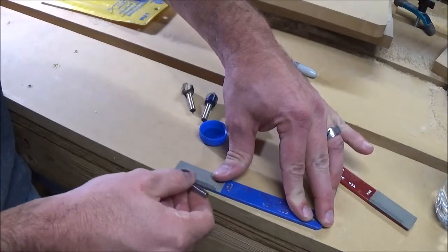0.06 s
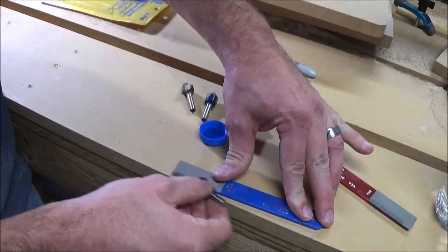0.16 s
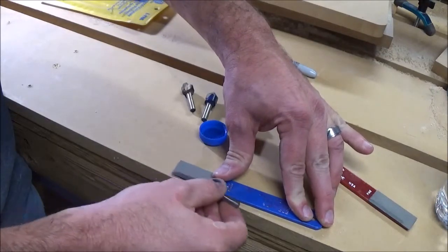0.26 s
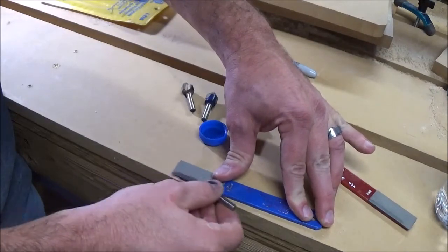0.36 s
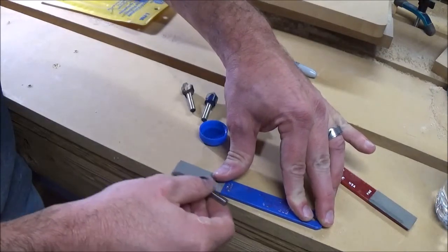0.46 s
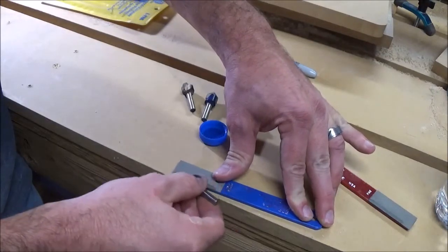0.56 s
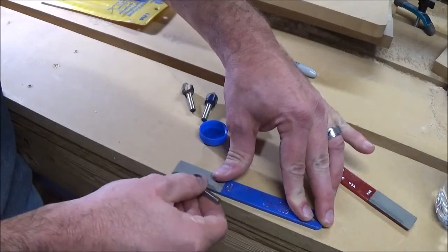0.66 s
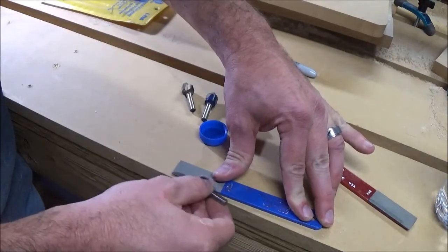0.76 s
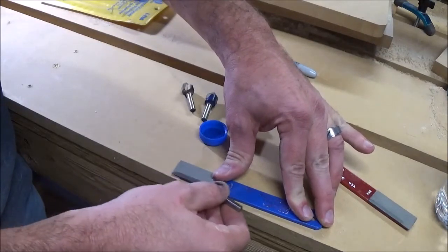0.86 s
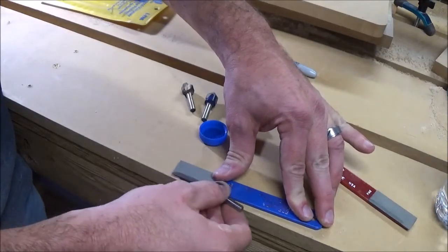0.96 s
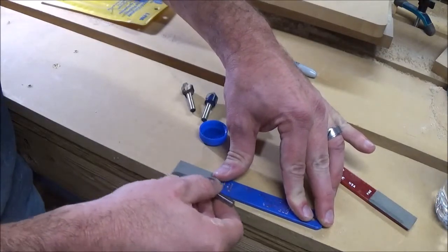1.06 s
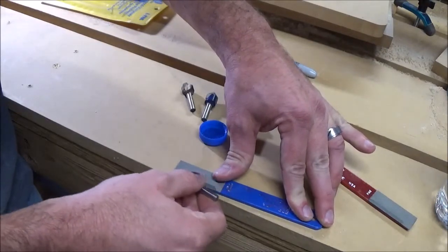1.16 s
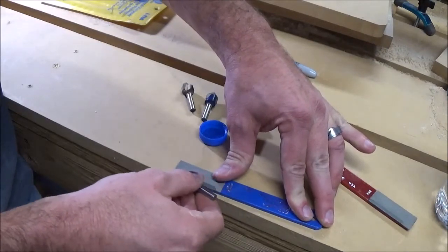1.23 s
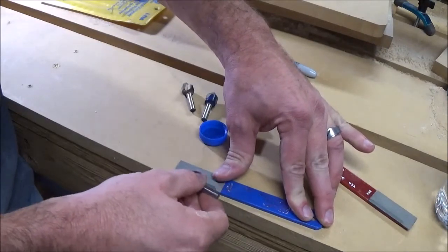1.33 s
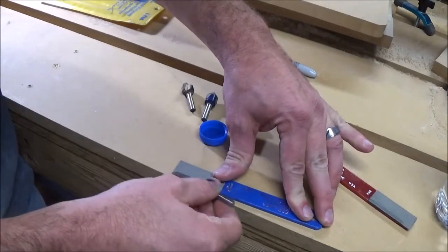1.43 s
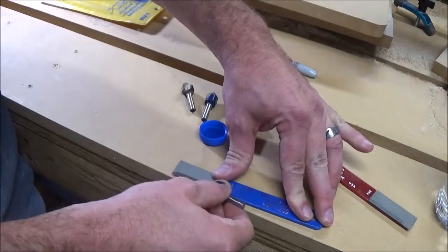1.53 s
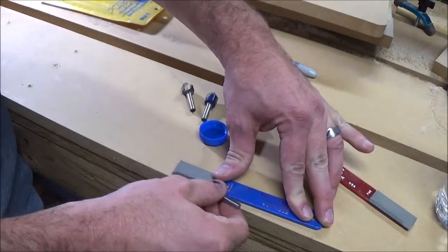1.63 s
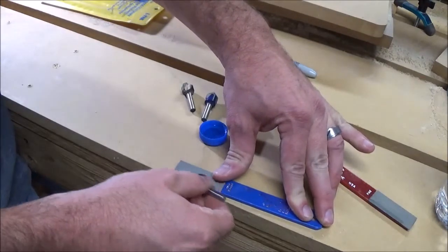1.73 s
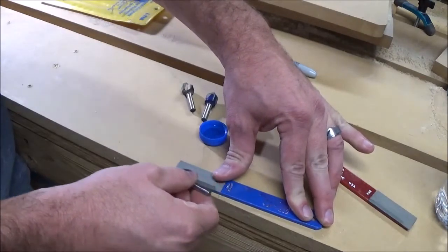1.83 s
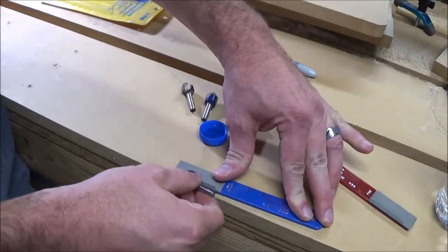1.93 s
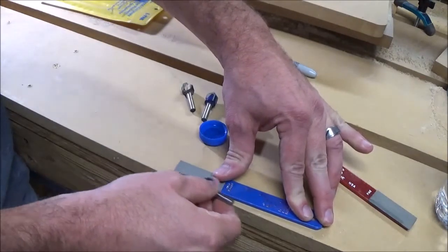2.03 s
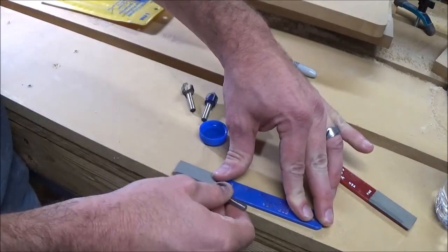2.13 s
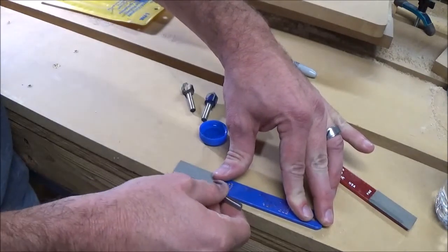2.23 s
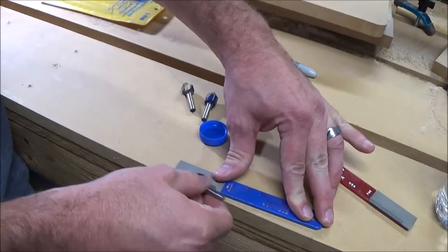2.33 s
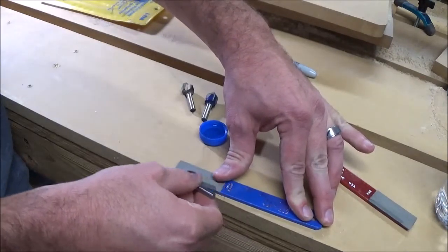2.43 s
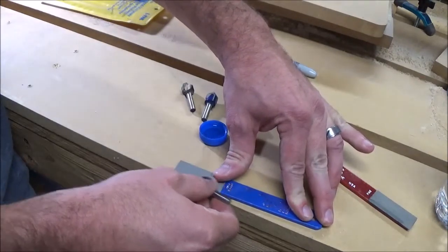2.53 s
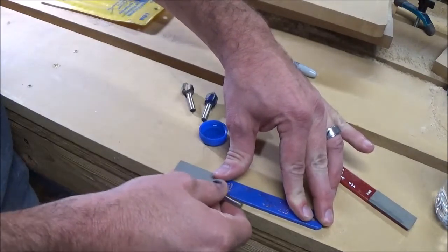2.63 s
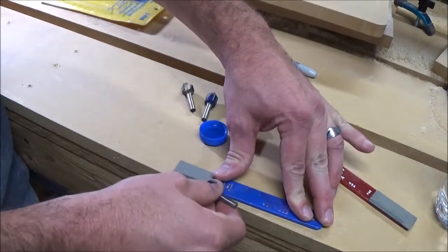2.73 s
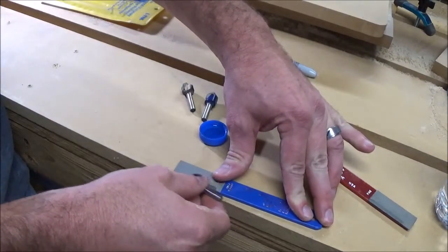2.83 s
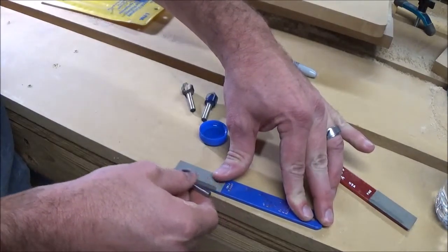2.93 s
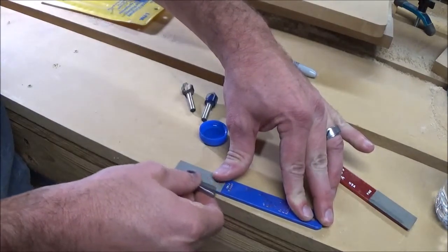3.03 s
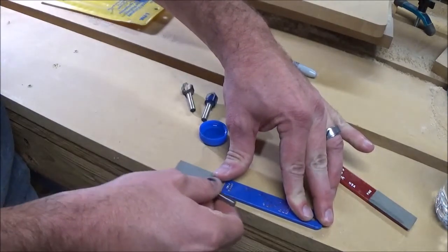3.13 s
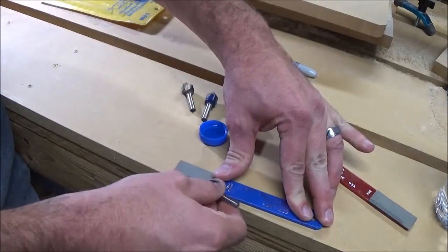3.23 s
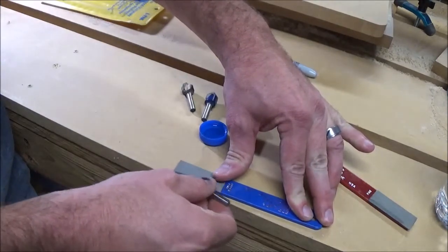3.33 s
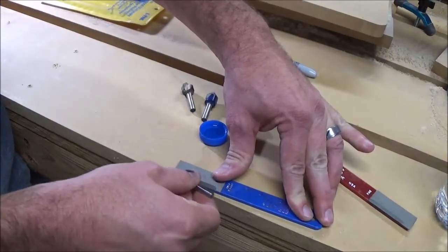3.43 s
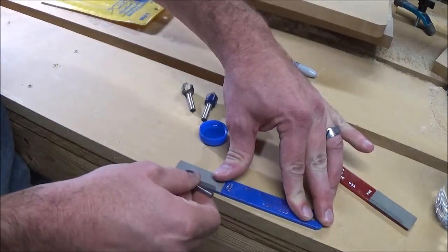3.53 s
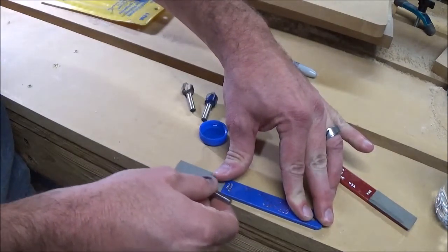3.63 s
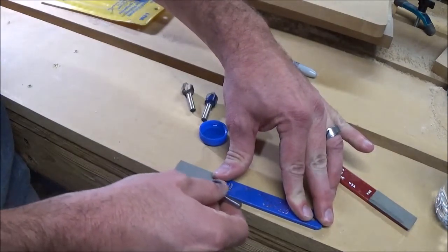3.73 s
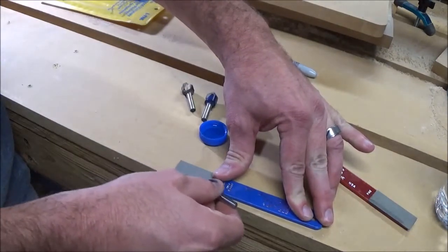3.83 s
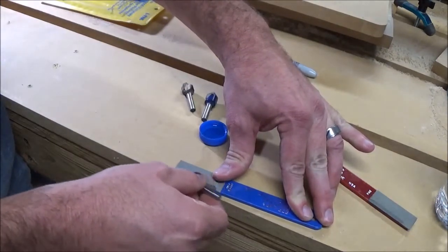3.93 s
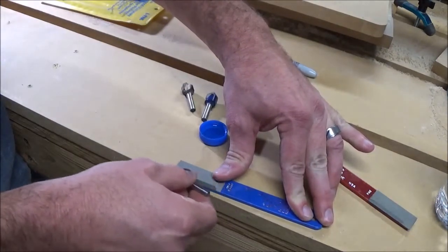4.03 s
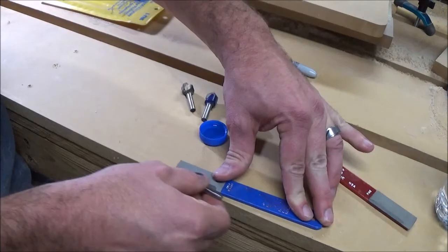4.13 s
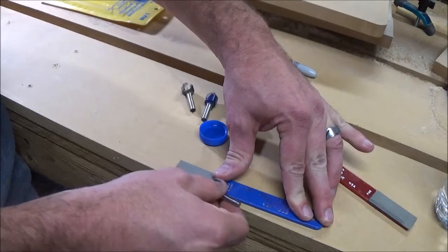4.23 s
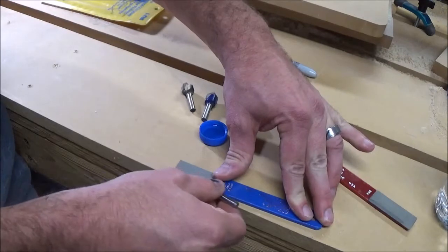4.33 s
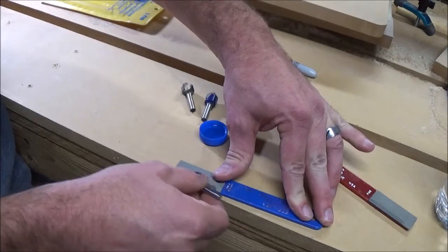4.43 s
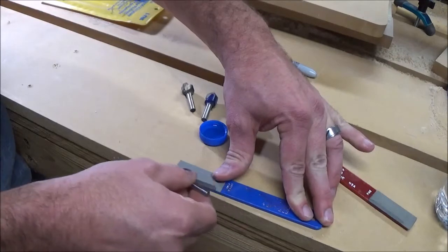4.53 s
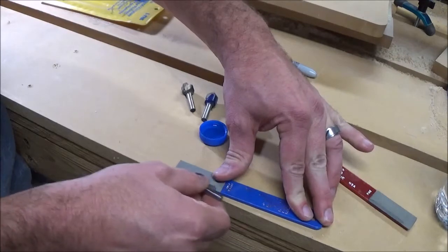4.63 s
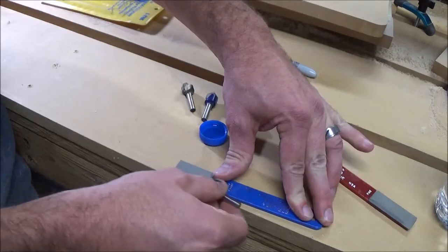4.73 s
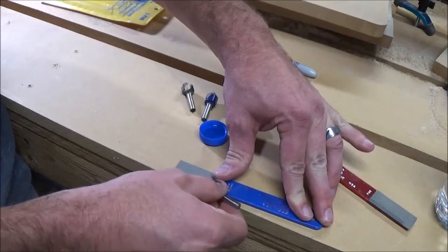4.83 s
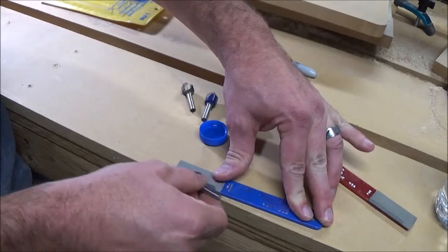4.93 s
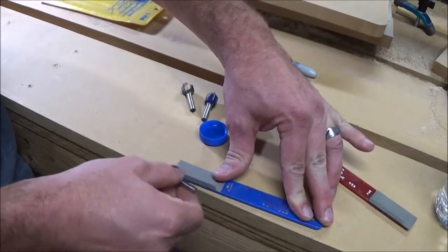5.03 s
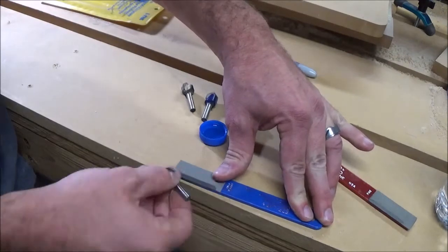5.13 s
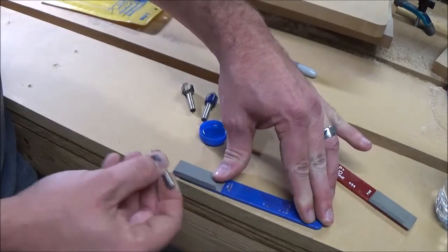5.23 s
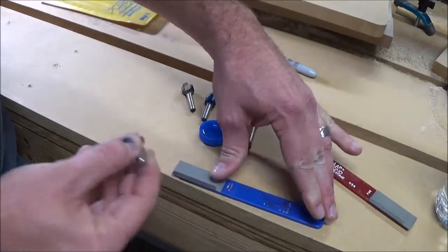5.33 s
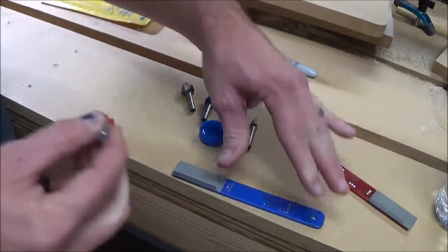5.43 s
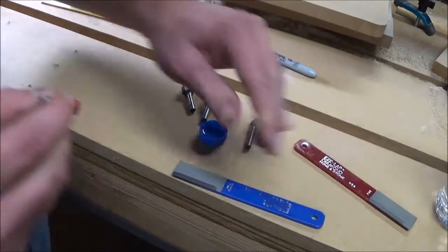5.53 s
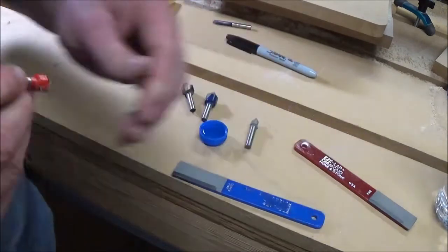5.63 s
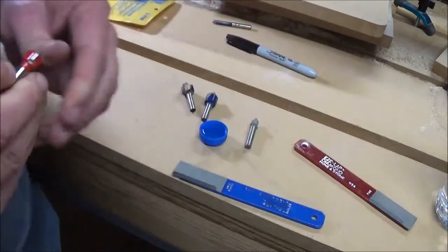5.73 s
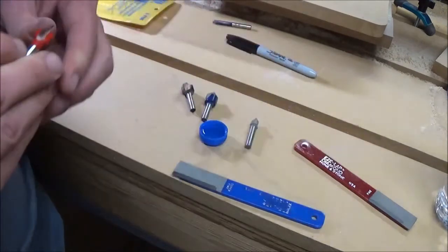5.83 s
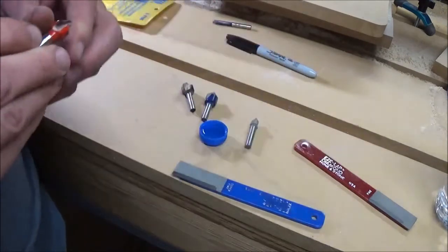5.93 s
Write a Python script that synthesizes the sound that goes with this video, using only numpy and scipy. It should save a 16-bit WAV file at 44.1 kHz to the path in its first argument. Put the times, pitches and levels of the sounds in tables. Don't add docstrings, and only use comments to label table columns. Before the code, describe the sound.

Rapid gritty metallic rubbing, about four strokes a second with tiny ticks at the turns, ends abruptly; faint hand clicks and room noise follow.

```python
import sys
import numpy as np
from scipy import signal
from scipy.io import wavfile
from scipy.ndimage import uniform_filter1d

SR = 44100
rng = np.random.default_rng(int(sys.argv[2]) if len(sys.argv) > 2 else 0)


def to_linear_factor(level_db):
    exponent = np.asarray(level_db, float) / 20
    return 10 ** exponent


def master_out(mix):
    frames = np.transpose(np.atleast_2d(mix))
    ceiling = np.clip(frames, -1, 1)
    pcm = np.round(ceiling * 32767).astype(np.int16)
    wavfile.write(sys.argv[1], SR, pcm)


N = 263718

# (start [s], length [s], pressure [dB], from place [0-1], to place [0-1])
STROKES = [(-0.046, 0.084, -1, 0.78, 0.64), (0.118, 0.139, 0.05, 0.94, 0.26),
           (0.445, 0.1, -0.1, 0.35, 0.54), (0.745, 0.16, 1.5, 0.65, 0.21), (1.015, 0.21, 1.0, 0.044, 0.82),
           (1.377, 0.17, 0.1, 0.72, 0.12), (1.631, 0.22, 0.8, 0.0, 0.86), (1.946, 0.23, 0, 0.91, 0.025),
           (2.221, 0.2, 1.5, 0.075, 0.77), (2.5, 0.14, 2, 0.81, 0.059), (2.735, 0.23, -1.4, 0.1, 0.88),
           (3.05, 0.16, 0.1, 0.91, 0.02), (3.309, 0.19, -1.0, 0.084, 0.94), (3.55, 0.21, -1.5, 0.94, 0.035),
           (3.831, 0.23, -1.15, 0.11, 0.93), (4.095, 0.18, -0.9, 1.0, 0.068),
           (4.352, 0.21, -1.3, 0.09, 0.95), (4.598, 0.2, -1.5, 0.92, 0.1), (4.861, 0.23, -0.8, 0.15, 0.92)]
# (place [0-1], bit [dB], hone [dB], bench [dB])
FORWARD_RESPONSE = [(0.0, -26.5, -34, -44.5), (0.17, -30.5, -34, -38), (0.37, -26, -30.5, -36),
                    (0.5, -18.5, -30, -34.5), (0.61, -20, -33.5, -38.5), (0.73, -22, -31, -34.5),
                    (0.87, -29.5, -33, -39), (1.0, -24.5, -29.5, -40.5)]
# (place [0-1], bit [dB], hone [dB], bench [dB])
BACKWARD_RESPONSE = [(-0.0, -28.5, -36.5, -39.5), (0.16, -25.5, -34, -36.5), (0.34, -24.5, -30.5, -36),
                     (0.5, -17, -36, -37), (0.62, -24.5, -32.5, -39.5), (0.74, -17, -27.0, -34.5),
                     (0.87, -26.5, -38, -46.5), (1.0, -19, -28, -44)]
# (bit [dB], hone [dB], bench [dB])
COAST_DB = (-44, -45, -43.5)
# (bit [dB], hone [dB], bench [dB])
CREEP_DB = (-50.5, -65, -58.5)
# (start [s], length [s], bit [dB], hone [dB], bench [dB])
SLIPS = [(.333, .082, -46, -50, -52.5), (0.554, 0.022, -25.5, -37.5, -42.5), (.605, 0.055, -56, -53, -69),
         (1.388, .025, -17, -36, -50), (1.952, 0.013, -32, -53, -50), (1.273, 0.084, -45, -55, -52),
         (1.897, 0.048, -40, -50, -47.5), (2.463, 0.033, -40, -47, -53), (2.682, 0.022, -40, -53, -47.5),
         (2.993, 0.027, -41, -57, -58), (3.246, 0.013, -35, -39, -41), (5.062, 0.02, -20, -24.5, -40)]
# (start [s], length [s])
LIFTS = [
    (.417, 0.03),
    (1.352, 0.038),
    (4.334, 0.018),
]

# (frequency [Hz], width [Hz],
# level [dB] when touched at the handle end, one quarter, middle, three quarters, tip)
BIT_MODES = [(6420, 460, -9, -0.5, -13, -19, -0.5), (6980, 910, 4, -4, -21.5, -6, -4),
             (7690, 670, -2, -8, -10.5, 0, -5.5), (8020, 160, -32, -5.5, 0, -2.5, 3),
             (8170, 120, -16, -10.5, -8, -16, -25), (8290, 250, -11, -8.5, 2, -7, -1),
             (8560, 92, -28, -8, 0.5, 1, -13), (8810, 160, 0, -11.5, -4.5, 1, -10),
             (9200, 510, -1, -17, 1, -13.5, -9), (9710, 150, -10, -2, -15, -6, -6.5),
             (10080, 210, 2, -11, -7, -6, -29), (10850, 370, -1.5, -3, -12.5, 0.5, -5)]
HONE_MODES = [(3035, 680, -2, 1, 3.5, 3, 1.5), (3610, 190, 5, -1.5, -4.5, 0.5, 0),
              (3903, 500, -2.5, 7.5, 7.5, -4, 5), (4380, 440, 5, -5.5, 0.5, -6.5, -5),
              (4705, 230, -5, -4.5, -1.5, -1, -12), (5600, 1300, 9, -4.5, -1, 7, 0.5)]
BENCH_MODES = [(627.5, 167, -8, -21, -8.5, -9, -13.5), (1095, 580, -14.5, -11, -8, -3.5, -6.5),
               (1203, 60, -14, -11.5, -5.5, -2, -8.5), (1546, 670, -14.5, -8.5, -2, -3.5, -3.5),
               (1874, 110, -14.5, -3, -4, -1, -9.5), (2006, 250, -15, -2, -7, -13, -1),
               (2570, 730, -4, 3.5, 2, 2.5, -16)]
# (frequency [Hz], width [Hz], level [dB])
BENCH_LOW_MODES = [(240, 142, 2), (418, 36, 2.5), (548, 29, -6.5)]
# (place [0-1], frequency [Hz])
EDGE_RING = [(0, 6420), (.45, 8140), (.75, 9770), (1, 9000)]

# (time [s], peak [dB], pitch [Hz], low part [dB])
ROCKING_TICKS = [(0.1096, -17, 10300, -34), (0.589, -24, 8700, -21.5), (0.599, -17.5, 6800, -45),
                 (0.6436, -17.5, 9400, -20), (0.6664, -29, 8500, -24), (0.684, -28, 8700, -29),
                 (0.69, -24, 9430, -28), (0.7018, -27, 9200, -34), (0.705, -22, 9400, -38),
                 (0.7184, -33, 6730, -29), (0.7211, -22, 4930, -39), (0.7404, -15, 9740, -18),
                 (1.2795, -28, 9500, -33), (1.284, -19.5, 9200, -22), (1.3154, -11.5, 9050, -13),
                 (1.331, -23, 8100, -28), (1.345, -30.5, 8000, -21), (1.9043, -21, 8200, -39),
                 (1.9176, -17.5, 8420, -24), (1.929, -14, 8350, -28), (3.006, -31, 8000, -25),
                 (4.109, -19, 8650, -25), (4.113, -14, 8560, -16), (4.131, -13, 8360, -28),
                 (0.3691, -33, 4250, -34),
    (1.6004, -27, 6640, -22),
    (2.691, -22, 8100, -30),
    (3.284, -28, 9790, -12),
    (3.2987, -22.5, 8070, -31),
    (4.318, -31, 9500, -30),
    (4.329, -21, 7500, -30),
    (4.844, -31, 7500, -28),
]
# (time [s], peak [dB], pitch [Hz], low part [dB], decay [ms])
LETTING_GO = [
    (5.483, -40, 2420, 3.5, 0.47),
    (5.4884, -34.5, 4600, -20, 1.2),
    (5.4943, -31.5, 4900, -9, 1.5),
    (5.6344, -33, 3760, -7, 1.2),
]
# (time [s], peak [dB], decay [ms], hardness [dB])
THUDS = [
    (0.019, -37.5, 32, -9),
    (.69, -43, 46, -30),
    (1.951, -35.5, 87, -7),
    (5.3659, -33.5, 5.9, 15),
    (5.385, -43, 16, -7),
    (5.451, -47, 31, -18),
    (5.485, -40.5, 6.6, -5.5),
    (1.314, -32, 8.5, 2),
]

# (frequency [Hz], t60 [s], left-right difference [dB])
SHOP = [(200, 1, -21), (1030, 0.46, -4.5), (2970, 0.22, 1), (9000, 0.28, -3.5)]
# (frequency [Hz], density [dB per Hz])
AIR = [(18, -45), (30, -8), (92, -13), (151, -10), (185, -9), (214, -12.5), (282, -14.5), (441, -21),
       (538, -13.5), (610, -18), (2520, -20), (3070, -21.5), (5600, -26.5), (9000, -23), (11500, -26.5),
       (15000, -77), (22000, -120)]
# (time [s], level [dB])
AIR_SWELL = [(0, 2), (5.3, -1.5), (5.6, -4), (5.81, -2), (5.83, 0), (5.98, -1)]
# (frequency [Hz], correlation [-1 to 1])
AIR_SAME = [(60, 0.97), (220, 0.88), (820, 0.23), (3020, 0.46), (11200, 0.73)]
# (frequency [Hz], rms [dB])
HUM = [(60, -62.5), (90, -76), (183, -65.5)]
# (time [s], peak level [dB])
PIP_DB = [(5.8, -51.5), (5.83, -54)]


def rubbing():
    place, bit_drive, hone_drive, bench_drive = hand()
    slips = grit(2200, spread_db=2.5, slurry=0.68, clump_db=0.81)
    finer = slips + 0.56 * rng.standard_normal(N)
    bench = touched(finer, BENCH_MODES, place) + to_linear_factor(-17.0) * body(finer, BENCH_LOW_MODES)

    forward = uniform_filter1d(1.0 * (np.gradient(place) > 0), size=400)
    edge_hz = np.interp(place, *np.transpose(EDGE_RING))
    edge_gain = 0.17 + 0.48 * forward
    edge = edge_gain * gliding(slips, edge_hz, 840)
    ring = chatter(depth_db=4.2) * (touched(slips, BIT_MODES, place) + edge)

    squeak_hz, squeak_width_hz, squeak_db = 5870, 710, 5.5
    squeak_place, squeak_reach = 0.85, 0.05
    nearness = np.exp(-((place - squeak_place) / squeak_reach) ** 2)
    squeak = (1 - forward) * nearness * body(finer, [(squeak_hz, squeak_width_hz, 0)])
    hone = touched(finer, HONE_MODES, place) + to_linear_factor(squeak_db) * squeak
    return bit_drive * ring + hone_drive * hone + bench_drive * bench


def hand():
    t = np.arange(0, N + 64, 32) / SR
    stroke_attack_s, stroke_release_s = 0.019, 0.019
    slip_attack_s, slip_release_s = 0.0064, 0.011
    coast_db_per_s, lift_db = -118, -7

    start, length, _, origin, goal = np.transpose(STROKES)
    turn_times = np.ravel([start, start + length], "F")
    turn_places = np.clip(np.ravel([origin, goal], "F"), 0, 1)
    place = np.interp(t, turn_times, turn_places)

    power = to_linear_factor(2 * np.array(CREEP_DB))[:, None] * (t < start[-1] + length[-1])
    for s, long, pressure_db, origin, goal in STROKES:
        at, *answers = np.transpose(FORWARD_RESPONSE if goal > origin else BACKWARD_RESPONSE)
        answer_db = np.array([np.interp(place, at, a) for a in answers])
        stroke = to_linear_factor(pressure_db + answer_db) * gate(t, s, long, stroke_attack_s, stroke_release_s)
        since = t - s - long
        coast_db = np.array(COAST_DB)[:, None] + coast_db_per_s * np.maximum(since, 0)
        coast = to_linear_factor(coast_db) * (since > 0)
        power = power + stroke ** 2 + coast ** 2
    for s, long in LIFTS:
        power = power * to_linear_factor(2 * lift_db * gate(t, s, long, slip_attack_s, slip_release_s))
    for s, long, *dbs in SLIPS:
        slip = to_linear_factor(np.array(dbs))[:, None] * gate(t, s, long, slip_attack_s, slip_release_s)
        power = power + slip ** 2
    return [np.interp(np.arange(N) / SR, t, curve) for curve in (place, *np.sqrt(power))]


def gate(t, start, length, attack_s, release_s):
    edge_db = -23.5
    rise = (t - start) / attack_s
    fall = (start + length - t) / release_s + 1
    inside = np.minimum(rise, fall)
    return to_linear_factor(edge_db * (1 - np.minimum(inside, 1)))


def grit(per_s, spread_db, slurry, clump_db):
    sizes = to_linear_factor(spread_db * np.minimum(rng.exponential(1, N), 3.0))
    happens = rng.random(N) < per_s / SR
    slips = sizes * happens * rng.choice([-1.0, 1.0], N)
    clumps = uniform_filter1d(uniform_filter1d(rng.standard_normal(N), size=200), size=200)
    excitation = evened(slips) + slurry * rng.standard_normal(N)
    return evened(excitation * to_linear_factor(clump_db * evened(clumps)))


def touched(x, modes, place):
    grip_db, grip_per_s = 2.5, 14
    t, knots = np.arange(N) / SR, np.arange(0, N / SR + 1, 1 / grip_per_s)
    gains, rings = [], []
    for hz, width, *dbs in modes:
        shape = to_linear_factor(np.interp(4 * place, range(5), dbs))
        grip = np.interp(t, knots, rng.standard_normal(len(knots)))
        gains.append(shape * to_linear_factor(grip_db * grip))
        rings.append(evened(resonate(resonate(x, hz, width), hz, 1.51 * width)))
    total = sum((-1) ** k * g * r for k, (g, r) in enumerate(zip(gains, rings)))
    return total / np.linalg.norm(gains, axis=0)


def gliding(x, hz, width):
    turn = np.exp(2j * np.pi * np.cumsum(hz) / SR)
    r = np.exp(-np.pi * width / SR)
    smoothed = signal.lfilter([1], [1, -2 * r, r * r], x / turn)
    return evened((turn * smoothed).real)


def chatter(depth_db):
    bounce = uniform_filter1d(uniform_filter1d(rng.standard_normal(N), size=36), size=36)
    return evened(to_linear_factor(depth_db * np.tanh(evened(bounce))))


def body(x, modes):
    total = 0
    for k, (hz, width, db, *_) in enumerate(modes):
        total = total + (-1) ** k * to_linear_factor(db) * resonate(x, hz, width) / np.sqrt(width)
    return evened(total)


def resonate(x, hz, width):
    return signal.lfilter(*signal.iirpeak(hz, hz / width, SR), x)


def evened(x):
    return x / np.sqrt(np.mean(x ** 2) + 1e-20)


def ticks():
    size, tick_ms = 2000, 0.86
    out, ms = np.zeros(N + size), np.arange(size) / SR * 1000
    rows = [(*row, tick_ms) for row in ROCKING_TICKS] + LETTING_GO
    shakes = rng.standard_normal((len(rows), size))
    for (s, db, hz, low_db, decay_ms), shake in zip(rows, shakes):
        burst = shake * np.exp(-ms / max(decay_ms, 0.2)) * np.minimum(ms / 0.4, 1)
        ring = resonate(resonate(burst, hz, 2000), hz, 5200)
        knock = body(shake * np.exp(-ms / 2.3), BENCH_MODES[3:])
        at = round(s * SR)
        out[at:at + size] += to_linear_factor(db) * (ring / abs(ring).max() + to_linear_factor(low_db) * knock / abs(knock).max())
    return out[:N]


def thuds():
    size = 8000
    upper_modes = [(800, 500, 0), (1220, 350, 0), (1750, 500, 0), (2500, 900, 0)]  # (Hz, width Hz, dB)
    out, ms = np.zeros(N + size), np.arange(size) / SR * 1000
    shakes = rng.standard_normal((len(THUDS), size))
    for (s, db, decay_ms, hard_db), shake in zip(THUDS, shakes):
        push = shake * np.exp(-ms / decay_ms) * np.minimum(ms * to_linear_factor(hard_db), 1)
        thud = body(push, BENCH_LOW_MODES) + to_linear_factor(hard_db) * body(push, upper_modes)
        at = round(s * SR)
        out[at:at + size] += to_linear_factor(db) * thud / abs(thud).max()
    return out[:N]


def shop(x):
    taps = np.zeros((2, SR // 2))
    at = np.arange(100, SR // 2 - 20, 20)
    at = at + rng.integers(0, 20, (2, len(at)))
    signs = rng.choice([-1.0, 1.0], at.shape)
    np.put_along_axis(taps, at, signs, 1)
    hz, t, z = signal.stft(taps, SR, nperseg=256)
    t60 = read([(row[0], row[1]) for row in SHOP], hz)[:, None]
    apart_db = read([(row[0], row[2]) for row in SHOP], hz)[:, None]
    shared, apart = z * to_linear_factor(-60 * t / t60)
    apart = to_linear_factor(apart_db) * apart
    tail = signal.istft(np.array([shared + apart, shared - apart]), SR, nperseg=256)[1]
    return signal.fftconvolve(x[None], tail / np.linalg.norm(tail[0]), axes=1)[:, :N]


def read(points, hz):
    f, value = np.transpose(points)
    return np.interp(np.log(hz + 1), np.log(f + 1), value)


def air():
    frames, hz = N // 512 + 5, np.fft.rfftfreq(2048, 1 / SR)
    a, b, c, d = rng.standard_normal((frames, 1025, 4)).T
    same = np.clip(read(AIR_SAME, hz), -1, 1)[:, None]
    left = a + 1j * b
    right = same * left + np.sqrt(1 - same ** 2) * (c + 1j * d)
    swell_db = np.interp(np.arange(frames) * 512 / SR, *np.transpose(AIR_SWELL)) * (hz[:, None] > 500)
    spectra = np.array([left, right]) * to_linear_factor(read(AIR, hz)[:, None] + swell_db)
    noise = evened(signal.istft(spectra, nperseg=2048, noverlap=1536)[1][:, :N])
    t = np.arange(N) / SR
    hum = sum(to_linear_factor(db) * np.sqrt(2) * np.sin(2 * np.pi * f * t) for f, db in HUM)
    return to_linear_factor(-51) * noise + hum


def electric_tick():
    rate_hz, first_s, pip_hz, pip_s = 30.02, 5.2222, 3085, 0.008
    t = np.arange(N) / SR
    count, since = np.divmod(t - first_s, 1 / rate_hz)
    variation_db = 1.5 * rng.standard_normal(400)[count.astype(int) % 400]
    db = np.interp(t, *np.transpose(PIP_DB)) + variation_db
    envelope = np.sin(np.pi * np.sqrt(np.clip(since / pip_s, 0, 1))) ** 2
    return to_linear_factor(db) * envelope * np.sin(2 * np.pi * pip_hz * since)


def scene():
    no_bass = signal.butter(2, 200, "high", fs=SR, output="sos")
    near = signal.sosfilt(no_bass, rubbing() + ticks() + thuds())
    dull = signal.lfilter([0.45], [1, -0.55], near)
    direct = near * to_linear_factor(np.array([[-0.9], [-0.1]]))
    return direct + to_linear_factor(-5.0) * shop(dull) + air() + electric_tick()


def band_limit(x):
    return signal.sosfilt(signal.butter(12, 11770, fs=SR, output="sos"), x)


def record(dry):
    squeezed = 0.5 * np.tanh(dry / 0.5)
    low_pass = signal.firwin(161, 10890, window=("kaiser", 7), fs=SR)
    limited = signal.oaconvolve(squeezed, low_pass[None], "same")
    return band_limit(limited)


dry = scene()
out = record(dry)
master_out(out)
```